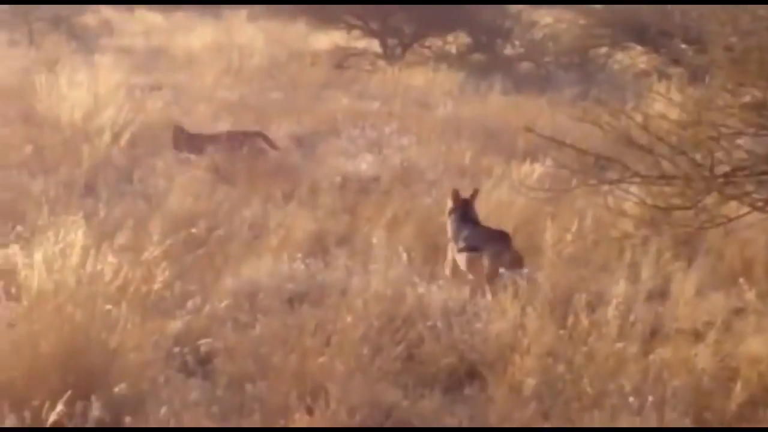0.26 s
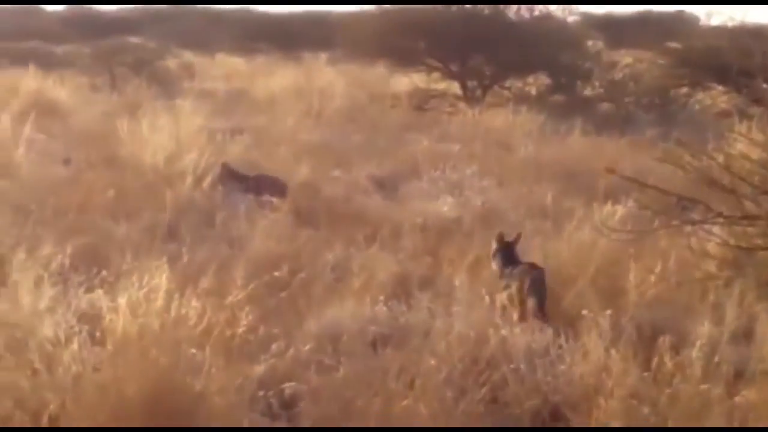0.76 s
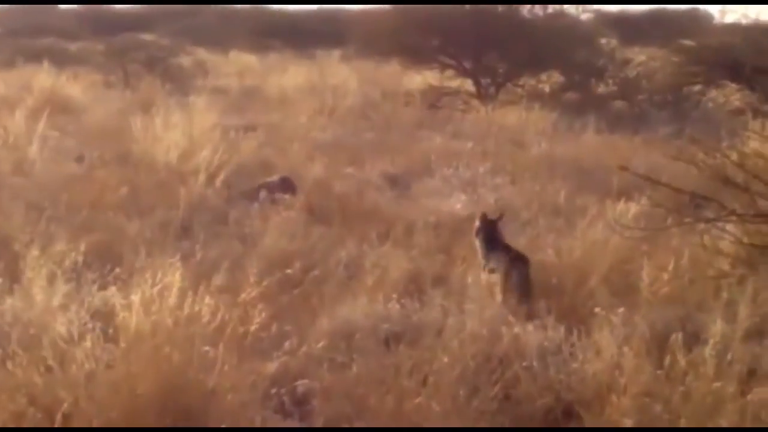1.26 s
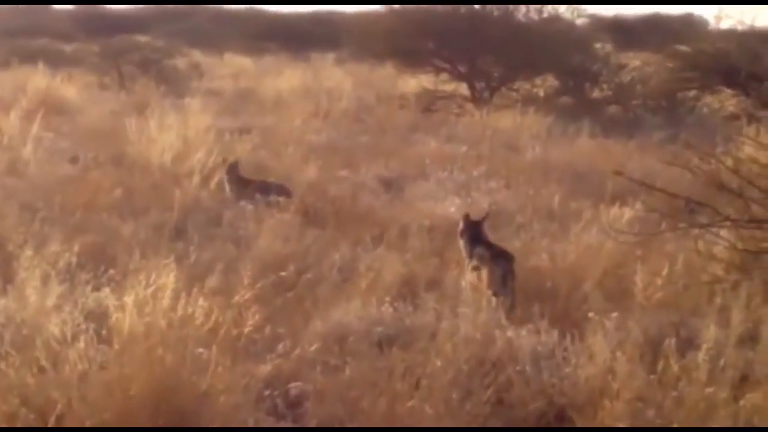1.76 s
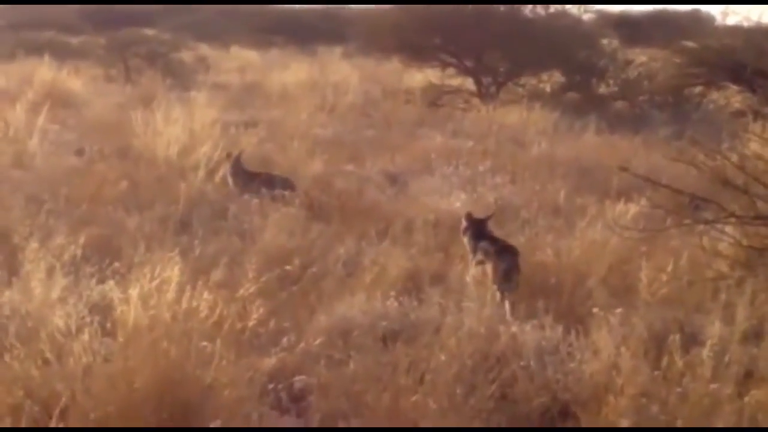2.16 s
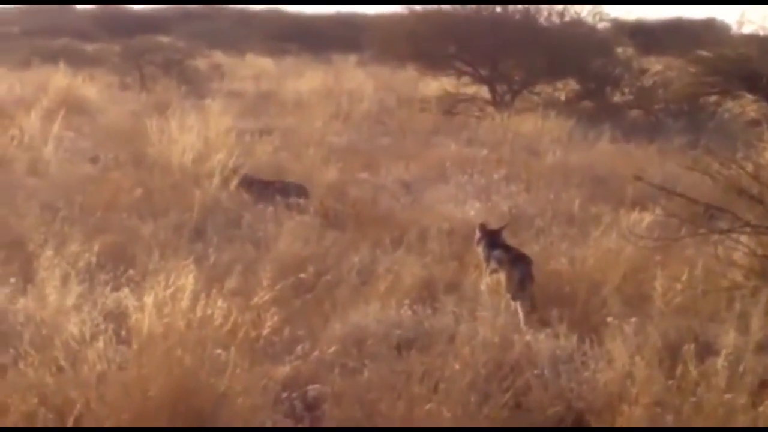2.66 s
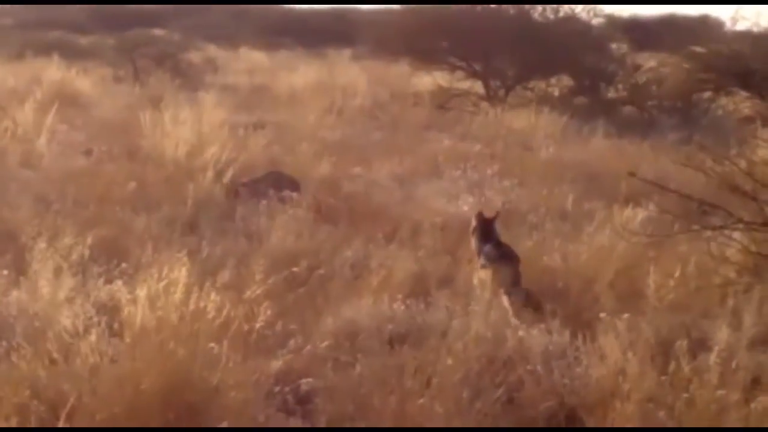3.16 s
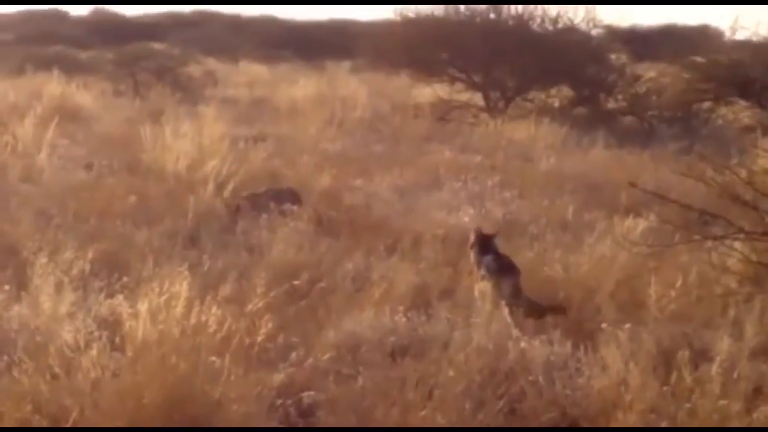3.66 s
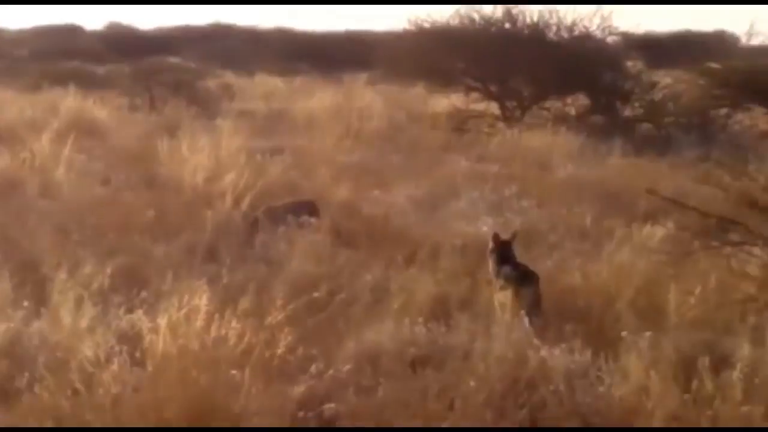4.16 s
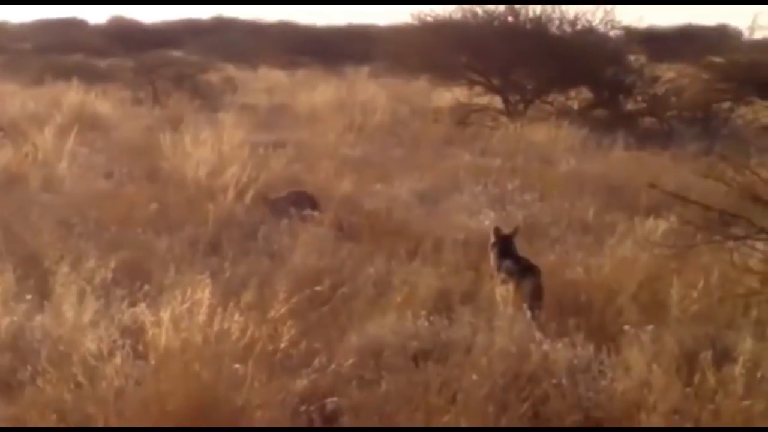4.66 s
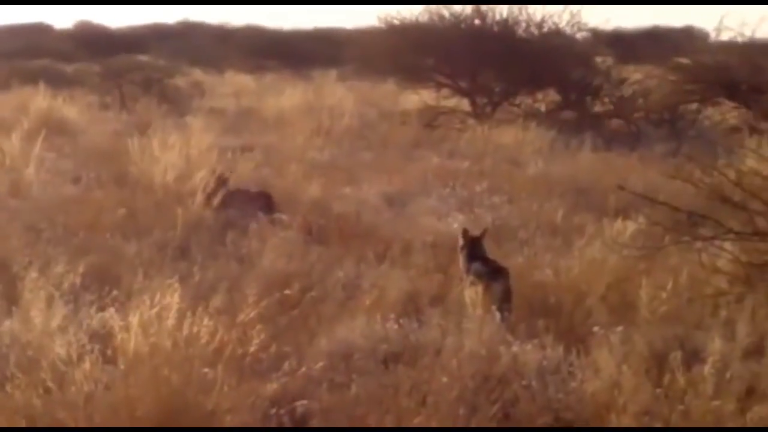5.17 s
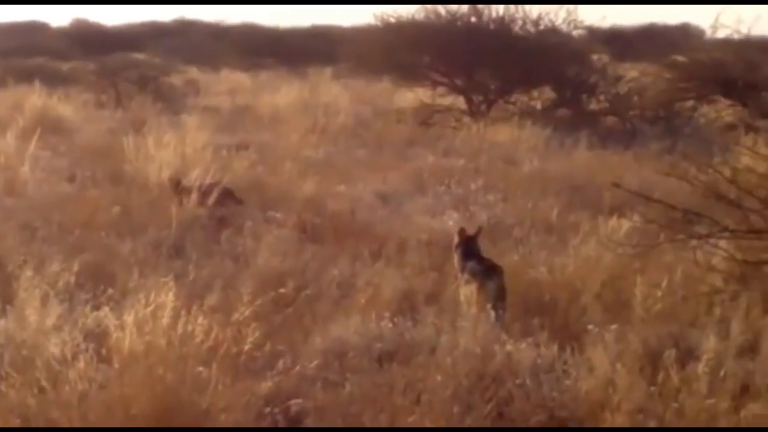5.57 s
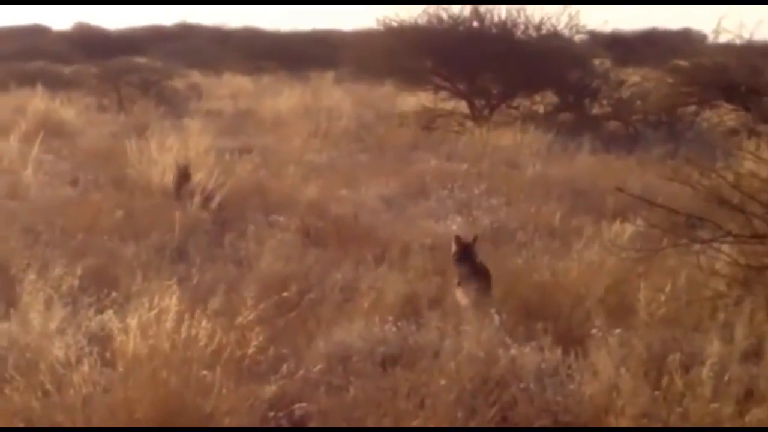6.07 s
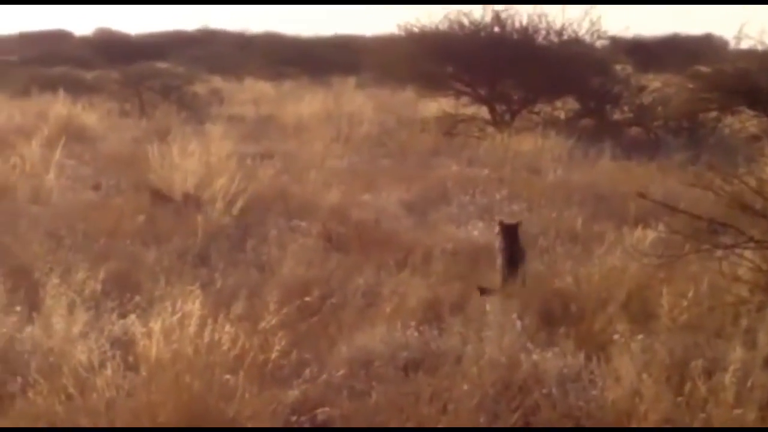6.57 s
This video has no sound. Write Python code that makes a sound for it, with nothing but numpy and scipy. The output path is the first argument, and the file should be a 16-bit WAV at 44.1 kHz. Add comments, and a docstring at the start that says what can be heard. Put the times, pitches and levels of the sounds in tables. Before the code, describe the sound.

Quiet open grassland in stereo: a faint grainy high hiss and softly stirring air swell gently. A jackal, slightly right, gives short muffled woofs at 0.3, 0.9 (stronger) and 1.5 seconds. Dry stalks swish at 0.5, and small distant birds chip and slur, mostly in the first two seconds. From 2.2 a low, pulsing growl grows hoarser and runs into a loud yelp at 2.9-3.3, rasping, breaking upward to a clear note near 600 Hz, then sinking; grass crackles around 3.0. A second, brighter yelp comes at 3.6-3.9 with a slight bump. Soft woofs follow at 4.2, 4.6, 5.1, 5.6 and a sharper one at 6.1. The microphone clicks and thuds at 4.27 and harder, on the left, at 5.8. A faint hollow tone swells near 5.4; a bird repeats its phrase from 5.8. The highest yelp, near 700 Hz, quavers at 6.5-6.85, with faint scattered echoes.

```python
"""A jackal in open grassland gives short muffled woofs, a low growl and three high yelps.
Its voice is a train of rough pulses, shaped by filters for the throat and the mouth.
Dry grass rustles and hisses as filtered noise, small birds chirp far off as gliding sine tones,
faint hollow tones swell and fade, and the microphone housing is bumped a few times.
Grass and trees throw back scattered echoes of the jackal and the birds."""
import sys
import numpy as np
from scipy import signal
from scipy.fft import rfft, irfft
from scipy.io import wavfile

SR = 44100
rng = np.random.default_rng(int(sys.argv[2]) if len(sys.argv) > 2 else 0)


def bounce(signal):
    """Save signal as a 16-bit WAV file at the path given by the first command-line argument."""
    frames = np.transpose(np.atleast_2d(signal))
    limited = np.clip(frames, -1, 1)
    pcm = np.round(limited * 32767).astype(np.int16)
    wavfile.write(sys.argv[1], SR, pcm)


N = 300762
TIME = np.arange(N) / SR

# the jackal's throat with the mouth nearly shut: (frequency [Hz], gain [dB])
SHUT_MOUTH = [(25, -50.5), (90, 3.5), (180, 2), (280, -1.5), (390, -0.5), (540, 6), (800, -13),
              (1080, -2.5), (1300, -15), (1600, -11), (2200, -53.5), (4000, -70)]


def amp(db):
    """Turns decibels into gain."""
    return 10 ** (np.asarray(db) / 20)


def unit(x):
    """Scales a sound to an average strength (rms) of 1."""
    return x / np.sqrt(np.mean(x ** 2) + 1e-20)


def bell(t, middle, half):
    """A smooth hump of height 1."""
    return np.exp(-((t - middle) / half) ** 2)


def spell(t, middle, length, depth):
    """Holds a depth for a while, with soft edges."""
    return depth * np.exp(-np.square(np.square(2 * (t - middle) / length)))


def follow(rows):
    """Gives sample times over a table of curves, and the curves at those times."""
    s, *columns = np.transpose(rows)
    t = np.arange(s[0], s[-1], 1 / SR)
    return t, *(np.interp(t, s, c) for c in columns)


def wander(size, hz):
    """Smooth random motion of rms 1, up to about hz."""
    length = size + SR // 4  # the spare part keeps the end from joining up with the start
    f = np.fft.rfftfreq(length, 1 / SR)
    smooth = rfft(rng.standard_normal(length)) * np.exp(-(f / hz) ** 2)
    return unit(irfft(smooth, length))[:size]


def read(points, hz):
    """Reads a spectrum table between its points, with pitch steps evenly spaced by ratio."""
    f, value = np.transpose(points)
    return np.interp(np.log(hz + 1), np.log(f + 1), value)


def tilted(spectrum, brightness):
    """Tips a spectrum around 1000 Hz by so many dB an octave."""
    return [(hz, db + brightness * np.log2(hz / 1000)) for hz, db in spectrum]


def colour(x, spectrum, size=2048):
    """Filters a sound to a spectrum, with no ringing ahead of the sound (minimum phase)."""
    log_gain = np.log(amp(read(spectrum, abs(np.fft.fftfreq(size, 1 / SR)))))
    taps = np.fft.ifft(np.exp(np.conj(signal.hilbert(log_gain)))).real
    return signal.oaconvolve(x, taps)[:len(x)]


def resonate(x, hz, width):
    """A resonance of gain 1 that follows the curve hz; width is in Hz."""
    turn = np.exp(2j * np.pi * np.cumsum(hz) / SR)
    r = np.exp(-np.pi * width / SR)
    # shift the resonance down to 0 Hz, smooth there, and shift back up
    return 2 * (turn * signal.lfilter([1 - r], [1, -r], x / turn)).real


def stereo_noise(spectrum, shared, size=N):
    """Coloured noise of which a share (0-1 of its power) is common to both sides."""
    common, left, right = (unit(colour(rng.standard_normal(size), spectrum)) for _ in range(3))
    return np.sqrt(shared) * common + np.sqrt(1 - shared) * np.array([left, right])


def pan(db):
    """Left and right gains for a level difference; positive means louder on the left."""
    return amp([[db / 2], [-db / 2]])


def add(mix, s, sound):
    """Adds a sound to the mix at time s."""
    part = mix[..., max(round(s * SR), 0):][..., :sound.shape[-1]]
    part += sound[..., :part.shape[-1]]


def bush(x, t60, echo_db):
    """Scattered echoes from grass and thorn trees, different on each side, fading 60 dB in t60 seconds."""
    t = TIME[:SR]
    hits = rng.random((2, SR)) < 2000 / SR  # about 2000 echoes a second
    taps = rng.standard_normal((2, SR)) * hits * amp(-60 * t / t60)
    return amp(echo_db) * signal.fftconvolve(x[None], taps / np.linalg.norm(taps[0]), axes=1)[:, :N]


def grassland(grain_db=1.5, gust_db=1.5, self_noise_db=-93):
    """A grainy high hiss over softly stirring air, swelling with the breeze, plus the microphones' own noise."""
    # hiss of the grass: (frequency [Hz], gain [dB])
    hiss_spectrum = [(1000, -39), (1800, -21.5), (2700, -7.5), (3400, -6.5), (4400, -0.5), (5000, -1.5),
                     (5900, -8.5), (6600, -12.5), (7500, -22.5), (9500, -35.5), (15000, -49)]
    # low stirring of the air: (frequency [Hz], gain [dB])
    air_spectrum = [(15, -49.5), (25, -27), (81, -3.5), (119, -1.5), (225, -2), (567, -10), (701, -8),
                    (850, -9.5), (1180, -11.5), (1510, -8), (1910, -15), (2500, -15), (3250, -34.5),
                    (5500, -120)]
    # swells of the breeze: (middle [s], half length [s], added hiss [dB], added stirring [dB])
    gusts = [(0, .4, -64, -67), (0.69, .16, -65.5, -91.5), (1.396, 0.25, -63.5, -65),
             (2.814, .22, -70.5, -66.5), (4.08, .28, -78, -76), (5.396, .28, -67.5, -80),
             (6.5, .55, -67.5, -80.5)]
    calm_hiss_db, calm_air_db = -80, -74.5

    hiss_power, air_power = amp(calm_hiss_db) ** 2, amp(calm_air_db) ** 2
    for s, half, hiss_db, air_db in gusts:
        swell = bell(TIME, s, half)
        hiss_power = hiss_power + swell * amp(hiss_db) ** 2
        air_power = air_power + swell * amp(air_db) ** 2
    hiss = np.sqrt(hiss_power) * amp(grain_db * wander(N, 160)) * stereo_noise(hiss_spectrum, 0.3)
    air = np.sqrt(air_power) * amp(gust_db * wander(N, 13)) * stereo_noise(air_spectrum, 0.4)
    return hiss + air + amp(self_noise_db) * rng.standard_normal((2, N))


def hollows(width_hz=170):
    """Faint hollow tones far off: narrow bands of noise around one pitch that swell and fade."""
    # (start [s], length [s], pitch [Hz], level before the fades [dB])
    hollow_tones = [(0, 0.16, 1480, -85.5), (.39, .1, 1295, -69), (5.045, 0.82, 1459, -72.5)]
    out = np.zeros(N)
    for s, length, hz, level_db in hollow_tones:
        size = round(length * SR)
        tone = wander(size, width_hz) * np.sin(2 * np.pi * hz * TIME[:size])
        add(out, s, amp(level_db) * unit(tone) * np.hanning(size))
    return out


def whistle(hz, gain, flutter_db=2):
    """A bird's near-pure tone, fluttering on its way through the air."""
    tone = np.sqrt(2) * np.sin(2 * np.pi * np.cumsum(hz) / SR)
    return gain * amp(flutter_db * wander(len(hz), 170)) * tone


def chip(level_db, stress_db=3):
    """Three quick, unevenly stressed sweeps: down, more weakly up, and down."""
    length_s, high_hz, low_hz, rise_db = 0.064, 6300, 3960, -1
    u = np.linspace(0, 1, round(length_s * SR))
    zigzag = abs(1 - (3 * u) % 2)
    rising = np.floor(3 * u) == 1
    shape_db = rise_db * rising + stress_db * wander(len(u), 60)
    return whistle(low_hz + (high_hz - low_hz) * zigzag, amp(level_db + shape_db) * np.sin(np.pi * zigzag))


def slur(length, first_hz, last_hz, level_db):
    """One soft glide from the first pitch to the last."""
    hz = np.linspace(first_hz, last_hz, round(length * SR))
    return whistle(hz, amp(level_db) * signal.windows.tukey(len(hz), 0.6))


def phrase(level_db, stress_db=4.5):
    """A pip, a brief lull, a whistle that levels off and a downward flick; never twice the same."""
    length_s, pitch_varies = 0.092, 0.008
    pip_hz, whistle_hz, rise_s = 3850, 4794, 0.024
    gap_at_s, gap_s, gap_db = 0.028, 0.012, -14
    flick_s, flick_hz_per_s, flick_db = 0.014, 80000, -5

    t = np.arange(0, length_s, 1 / SR)
    hz = whistle_hz + (pip_hz - whistle_hz) * bell(t, 0, rise_s)
    hz = hz - flick_hz_per_s * np.maximum(t - length_s + flick_s, 0)
    hz = hz * (1 + pitch_varies * wander(len(t), 40))
    shape_db = gap_db * bell(t, gap_at_s, gap_s) + flick_db * bell(t, length_s, flick_s)
    shape_db = shape_db + stress_db * wander(len(t), 40)
    return whistle(hz, amp(level_db + shape_db) * signal.windows.tukey(len(t), 0.2))


def birds(echo_db=1, twitter_fall=0.14, twitter_spread_db=9):
    """Distant chips, slurs, bouts of one repeated phrase and a faint twitter, blurred by the bush."""
    # one bird's zigzag chips: (time [s], level [dB])
    chip_calls = [(0.159, -59), (0.854, -65), (1.028, -64), (1.128, -65.5), (2.03, -59.5)]
    # gliding notes of others: (time [s], length [s], first pitch [Hz], last pitch [Hz], level [dB])
    slur_calls = [(1.635, .11, 5000, 5770, -76.5), (1.713, 0.095, 4480, 2310, -68.5),
                  (1.843, 0.071, 4870, 3640, -64), (2.574, 0.067, 3030, 2650, -68),
                  (4.964, 0.0284, 4320, 3996, -64), (5.014, 0.02, 4380, 4180, -59.5),
                  (5.111, 0.065, 3850, 2690, -78), (5.584, 0.025, 6400, 5390, -63.5)]
    # bouts of a third bird's phrase: (start [s], stop [s], level of the first phrase [dB])
    phrase_bouts = [(2.208, 3.0, -69), (5.767, 6.8, -63)]
    phrase_every_s, phrase_growth_db = 0.2205, 1.04
    # farther birds: the highest level, and the range of starting pitches
    twitters_per_s, twitter_db, twitter_s = 14, -76, 0.017
    twitter_low_hz, twitter_high_hz = 3900, 5980

    song = np.zeros(N)
    for s, level_db in chip_calls:
        add(song, s, chip(level_db))
    for s, *shape in slur_calls:
        add(song, s, slur(*shape))
    for start, stop, level_db in phrase_bouts:
        for k, s in enumerate(np.arange(start, stop, phrase_every_s)):
            add(song, s, phrase(level_db + phrase_growth_db * k))
    for when, height, fall, distance in rng.random((round(twitters_per_s * N / SR), 4)):
        hz = twitter_low_hz + (twitter_high_hz - twitter_low_hz) * height
        last_hz = hz * (1 - twitter_fall * fall)
        add(song, when * N / SR, slur(twitter_s, hz, last_hz, twitter_db - twitter_spread_db * distance))
    return song * pan(-1.5) + bush(song, t60=0.27, echo_db=echo_db)


def bumps(thud_hz=85, thud_decay=0.0093, push=0.00022, push_db=6, thud_side_db=10):
    """A click, a brief push of air and a low wobble of the housing, the thud mostly on the left."""
    # (time [s], click [dB], thud [dB], side setting [dB]): half the side setting pans the click
    bump_rows = [(3.664, -57.5, -43, 14.5), (4.2679, -46, -38, 24), (4.269, -39, -33.5, -27.5),
                 (5.7783, -45, -45, 21), (5.796, -39, -25.5, 30)]
    # sound of the click: (frequency [Hz], gain [dB])
    click_spectrum = [(200, 5), (1400, 6), (2800, 0), (4800, 6.5), (6500, 3.5), (8000, -10), (14000, -31)]
    out, t = np.zeros((2, N)), TIME[:SR // 10]
    for s, click_db, thud_db, side_db in bump_rows:
        fade = np.exp(-t / 0.0022) + 0.14 * np.exp(-t / 0.023)
        click = colour(rng.standard_normal(len(t)) * fade, click_spectrum)
        wobble = np.sin(2 * np.pi * thud_hz * t) * np.exp(-t / thud_decay)
        thud = wobble - amp(push_db) * t / push * np.exp(1 - t / push)
        add(out, s, amp(click_db) * pan(side_db / 2) * click / abs(click).max())
        add(out, s, amp(thud_db) * amp([[0], [-abs(thud_side_db + side_db)]]) * thud)
    return out


def rustles(rise=0.0034, crackle_db=1.5):
    """Dry stalks scrape in quick, crackling swishes of noise."""
    # (time of the peak [s], level [dB], decay [s], left over right [dB])
    rustle_rows = [(0.488, -40, 0.02, 1.5), (0.501, -41.5, 0.017, 2), (0.54, -41.5, 0.017, 1),
                   (0.565, -37, .008, 2), (0.583, -47.5, 0.021, 0), (2.997, -43, 0.025, -1),
                   (3.013, -42, 0.015, -1.5), (3.05, -45, 0.033, 1), (3.075, -41, 0.013, 1),
                   (3.641, -55, 0.041, 15)]
    # sound of the stalks: (frequency [Hz], gain [dB])
    swish_spectrum = [(30, -43), (150, -19), (600, -17.5), (800, -24.5), (1400, -16.5), (1800, -20),
                      (2800, -5), (6000, -3.5), (7400, -19), (9000, -28.5), (12000, -36), (15000, -51)]
    out, t = np.zeros((2, N)), TIME[:SR // 5]
    for s, level_db, decay, side_db in rustle_rows:
        stroke = np.minimum(t / rise, 1) * np.exp(-np.maximum(t - rise, 0) / decay)
        crackle = amp(crackle_db * wander(len(t), 600))
        noise = stereo_noise(swish_spectrum, 0.44, size=len(t))
        add(out, s - rise, amp(level_db) * pan(side_db) * stroke * crackle * noise)
    return out


def folds(hz, rough, jitter, split=0, count=20):
    """Vocal fold pulses; roughness (0-1) unsettles their timing and adds a puff of air to each."""
    rough = np.clip(rough, 0.04, 1)
    unsteady = (0.0018 + jitter * rough ** 2) * wander(len(hz), 220)
    turns = np.cumsum(hz * (1 + unsteady)) / SR
    pulses = sum(np.cos(2 * np.pi * k * turns) for k in range(1, count + 1))
    pulses = pulses * (1 + split * np.cos(np.pi * turns))  # weakens every other pulse
    puffs = (0.2 + np.exp(-(turns % 1) / 0.2)) * rng.standard_normal(len(hz))
    return (1 - rough) * unit(pulses) + rough * 1.5 * unit(puffs)


def growl(waver_db=1.0, open_at_push=0.67, open_per_octave=0.87):
    """Slow, unsteady pulses behind a shut mouth, starting with a push; louder and hoarser as they rise."""
    # (time [s], pitch before a slight waver [Hz])
    growl_pitch = [(2.245, 75.3), (2.31, 97.8), (2.38, 74.25), (2.51, 81.8), (2.65, 82.4), (2.77, 95.7),
                   (2.9, 104.8), (2.96, 101.5)]
    # the throat while growling: (frequency [Hz], gain [dB])
    chest = [(25, -40.5), (80, -15), (160, 4.5), (230, -0.5), (305, 7.5), (400, -8), (560, -6),
             (760, -26.5), (940, -6.5), (1150, -46.5), (1430, -24.5), (2100, -46), (4000, -69.5)]
    # level and roughness at the middle pitch, and their change per octave
    middle_hz, middle_db, db_per_octave, rise_s = 84.4, -53, 15.5, 0.035
    middle_rough, rough_per_octave = 0.24, 0.4
    accent_db, accent_s = 1, 0.043

    t, hz = follow(growl_pitch)
    effort = np.log2(hz / middle_hz)
    push = bell(t, t[0] + rise_s, accent_s)
    level_db = middle_db + db_per_octave * effort + accent_db * push + waver_db * wander(len(t), 25)
    hz = hz * (1 + 0.02 * wander(len(t), 25))
    pulses = folds(hz, middle_rough + rough_per_octave * effort, jitter=0.93, count=40)
    opening = open_at_push * push + open_per_octave * np.maximum(effort, 0)  # the lips part a little
    voice = unit(colour(pulses, chest)) + opening * unit(colour(pulses, SHUT_MOUTH))
    voice = voice / np.sqrt(1 + opening ** 2)
    fade_in = np.minimum((t - t[0]) / rise_s, 1) ** 2
    return t[0], amp(level_db) * fade_in * voice * signal.windows.tukey(len(t), 0.03)


def woof(s, level_db, top_hz, half, brightness, skirt=0.06, skirt_lag_s=0.008, skirt_s=0.032):
    """A short grunt whose pitch arches with its effort; it starts faster than it dies."""
    t = np.arange(-0.05, 0.08, 1 / SR)
    rising, dying = np.exp(-(t / half) ** 2), 1 / (1 + (t / half) ** 2 / 2) ** 2
    effort = np.where(t < 0, rising, dying)
    rough = 0.28 + 0.4 * (1 - effort)
    effort = effort + skirt * bell(t, skirt_lag_s, skirt_s)  # air escapes softly before and after
    hz = top_hz * (0.6 + 0.36 * np.sqrt(effort))
    voice = colour(effort * folds(hz, rough, jitter=0.9), tilted(SHUT_MOUTH, brightness))
    return s + t[0], amp(level_db) * unit(voice) * np.sqrt(np.mean(effort ** 2))


def yelp(row, note, mouth_width_hz=200, shut_width_hz=160, quaver_hz=72, shimmer_db=1.0, noise_db=-39,
         break_dip_db=-2):
    """A rasping start breaks upward into a clear, slowly sinking note that ends in a rasp."""
    # the open throat: (frequency [Hz], gain [dB])
    throat = [(100, -11), (300, -9.5), (430, -8), (580, -2.5), (800, -8), (1150, 1), (1400, -1), (1730, 4),
              (1950, -7), (2300, -29.5), (2900, -33), (3600, -54.5), (6600, -51.5), (8000, -82.5)]
    # faint broad noise, low and high, that swells and fades with the yelp: (frequency [Hz], gain [dB])
    noise_spectrum = [(20, -24.5), (60, -5), (150, -0.5), (400, 0), (1500, 1), (2200, -10), (2700, 0.5),
                      (3400, -15), (5500, -18), (8000, -36.5)]
    # at its highest the voice splits, every other pulse weakening: (middle [s], length [s], depth [0-1])
    split_spell = (6.655, 0.026, 0.51)
    # then it quavers: (middle [s], length [s], depth [share of the pitch])
    quaver_spell = (6.69, .045, .04)
    # as the mouth half shuts: (middle [s], length [s], depth [0-1])
    half_shut_spell = (6.715, 0.11, 0.39)
    # a low rasp clears shortly before the break and scoops up into the note
    rasp_hz, scoop_s, clear_lead_s, clearing_s, break_s = 365.3, 0.017, 0.038, 0.0049, 0.009
    rough_rasp, rough_scoop, rough_note = 0.6, 0.1, 0.06
    # after the release the pitch drops while the sound dies
    release_s, drop_s, drop_hz, release_db_per_s = 0.046, 0.013, 312.6, 521
    # loudness swells from the start, is held back in the rasp and peaks in the scoop
    onset_db, rasp_db, scoop_db, effort_db_per_octave = -34, -7, 2.5, 8
    # the mouth resonates low while shut; open, it rises with the scoop and sharpens under strain
    shut_hz, open_hz, open_rise_hz_per_s, strain_hz = 640, 1410, 6400, 635.2
    shut_db, easy_db, strained_db, strain_db = 17.5, 10, 14.5, 5

    start, attack, peak_db, brightness, break_rough = row
    s, pitches = np.transpose(note)
    t = np.arange(start, s[-1] + release_s, 1 / SR)
    before, after = np.maximum(s[0] - t, 0), np.maximum(t - s[-1], 0)
    note_hz, held = np.interp(t, s, pitches), np.exp(-(after / drop_s) ** 2)
    hz = rasp_hz + (note_hz - rasp_hz) * np.exp(-before / scoop_s)
    hz = drop_hz + (hz - drop_hz) * held
    hz = hz * (1 + spell(t, *quaver_spell) * np.sin(2 * np.pi * quaver_hz * t))

    # the stages of the call
    clear = 0.5 + 0.5 * np.tanh((clear_lead_s - before) / clearing_s)
    scoop, breaking = clear * np.tanh(before / break_s), bell(t, s[0], break_s)
    strain = 0.5 + 0.5 * np.tanh((hz - strain_hz) / 20)
    shut = 1 - clear + (after / release_s) ** 2 + spell(t, *half_shut_spell)
    rough = rough_rasp + (rough_note - rough_rasp) * clear * held
    rough = rough + rough_scoop * scoop + break_rough * breaking

    # pulses through the throat, then the open and the shut mouth
    pulses = folds(hz, rough, jitter=0.22, split=spell(t, *split_spell), count=7)
    voice = colour(pulses, tilted(throat, brightness))
    lift_db = easy_db + (strained_db - easy_db) * np.maximum(scoop, strain)
    open_mouth = resonate(voice, open_hz - open_rise_hz_per_s * before, mouth_width_hz)
    shut_mouth = resonate(voice, np.full(len(t), shut_hz), shut_width_hz)
    voice = voice + amp(lift_db) * open_mouth + amp(shut_db) * shut * shut_mouth

    # even out the loudness, so that the level curve below sets it
    window = signal.windows.hann(600)
    loudness = np.sqrt(np.convolve(voice ** 2, window / window.sum(), "same") + 1e-12)
    noise = unit(colour(rng.standard_normal(len(t)), noise_spectrum))
    voice = unit(voice / loudness) + amp(noise_db) * noise
    level_db = peak_db + onset_db * np.exp((start - t) / attack) + rasp_db * (1 - clear)
    level_db = level_db + scoop_db * scoop + break_dip_db * breaking + strain_db * strain
    level_db = level_db + effort_db_per_octave * np.log2(note_hz / note_hz.mean())
    level_db = level_db - release_db_per_s * after + shimmer_db * wander(len(t), 70)
    return start, amp(level_db) * voice * signal.windows.tukey(len(t), 0.03)


def jackal(near_db=-17, near_delay=0.0031):
    """All the calls, mostly a little to the right, with short echoes from grass and longer ones from trees."""
    # (start [s], attack [s], base level [dB], brightness [dB per octave], roughness of the break [0-1])
    yelp_rows = [(2.92, 0.019, -22.5, 0.2, .25), (3.593, 0.0081, -21.5, 2.47, .8),
                 (6.509, 0.012, -22.5, 1, 0.3)]
    # each yelp's clear note, from the upward break to the release: (time [s], pitch [Hz])
    yelp_notes = [
        [(3.016, 537.6), (3.035, 573.2), (3.075, 600.4), (3.115, 556), (3.165, 554.5), (3.205, 524.3),
         (3.271, 499)],
        [(3.669, 556.3), (3.685, 580), (3.725, 602.6), (3.763, 592.4), (3.773, 562.5), (3.865, 548.7)],
        [(6.596, 642.8), (6.635, 696.5), (6.672, 697.3), (6.69, 617), (6.712, 593.5), (6.78, 567.6),
         (6.83, 527)],
    ]
    # (time [s], level [dB], pitch setting, nearly reached at the top [Hz], half length [s],
    #  brightness [dB per octave])
    woof_rows = [(0.341, -45, 203, 0.018, -4.5), (0.872, -34.5, 282.3, 0.017, 5),
                 (1.484, -46.5, 232.7, 0.017, -1), (4.219, -48.5, 197.5, .018, 3.5),
                 (4.634, -46.5, 232.2, 0.019, -0.5), (5.092, -53.5, 200.5, 0.022, -1),
                 (5.615, -46.5, 202.7, 0.02, -0.5), (6.086, -37.5, 299.4, .011, 3.5)]
    # how much louder the left side hears the jackal: (frequency [Hz], left over right [dB])
    lean = [(200, 1.5), (550, 0), (1400, -4.5), (4000, -6)]

    voice = np.zeros(N)
    yelps = [yelp(row, note) for row, note in zip(yelp_rows, yelp_notes)]
    for call in yelps + [woof(*row) for row in woof_rows] + [growl()]:
        add(voice, *call)
    hz = np.fft.rfftfreq(2 * N, 1 / SR)
    lean_db = read(lean, hz)
    # a reflection from close by reaches the two microphones in opposite phase
    near = amp(near_db) * np.exp(-2j * np.pi * hz * near_delay)
    sides = amp([lean_db / 2, -lean_db / 2]) + np.array([near, -near])
    direct = irfft(rfft(voice, 2 * N) * sides)[:, :N]
    trees = bush(voice, t60=0.9, echo_db=-38)
    grass = bush(voice, t60=0.021, echo_db=-15)
    return direct + grass + trees


def scene():
    """Everything that reaches the two microphones."""
    return grassland() + hollows() + birds() + bumps() + rustles() + jackal()


def record(dry):
    """Cuts off the highest treble with a steep low-pass filter."""
    edge_hz = 15100
    taps = signal.firwin(511, edge_hz, window=("kaiser", 9), fs=SR)
    return signal.oaconvolve(dry, taps[None], "same")


dry = scene()
out = record(dry)
bounce(out)
```